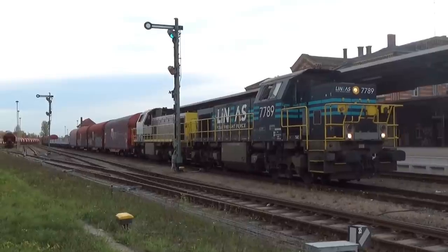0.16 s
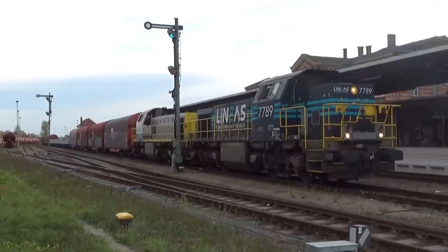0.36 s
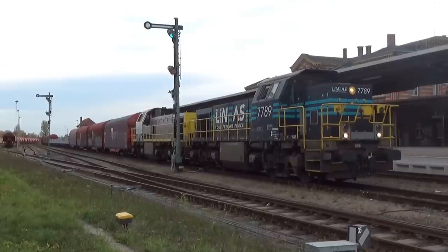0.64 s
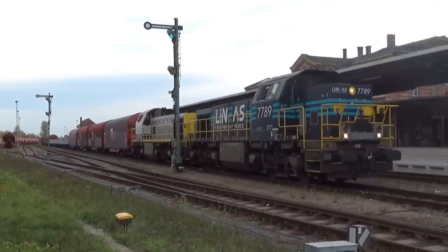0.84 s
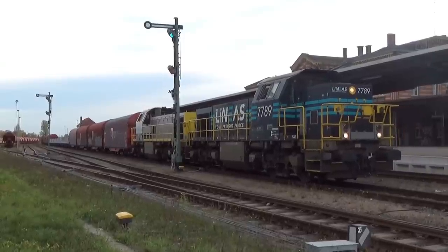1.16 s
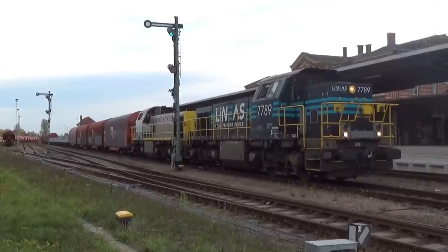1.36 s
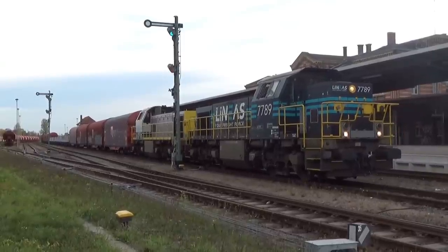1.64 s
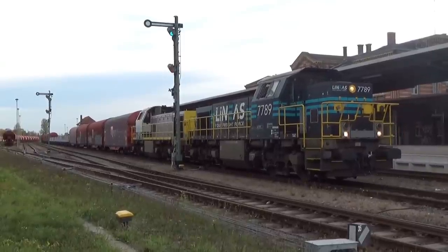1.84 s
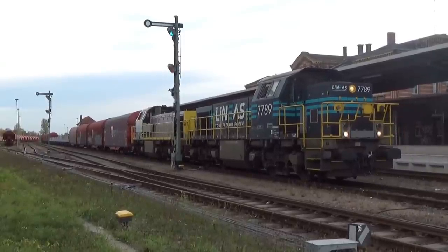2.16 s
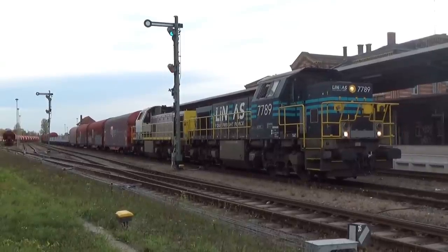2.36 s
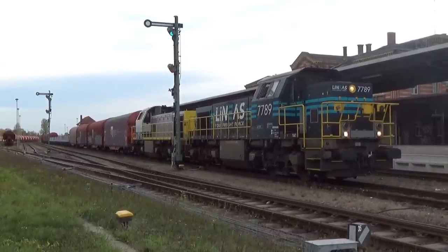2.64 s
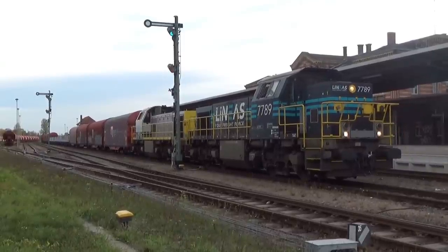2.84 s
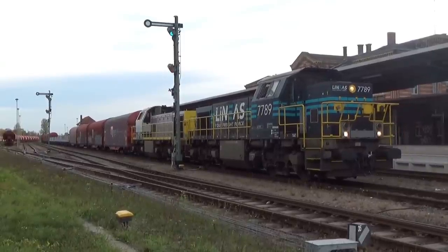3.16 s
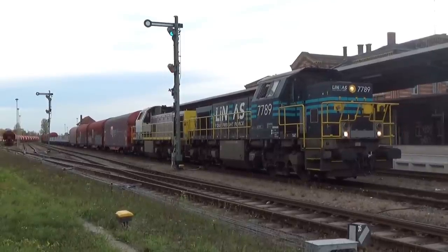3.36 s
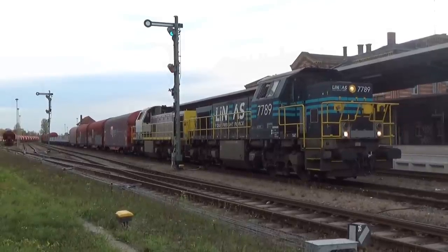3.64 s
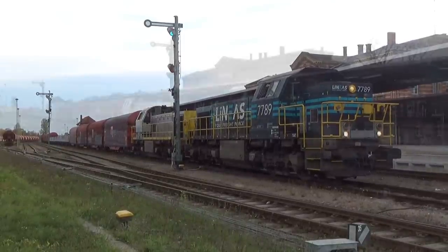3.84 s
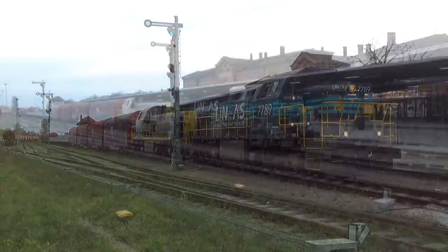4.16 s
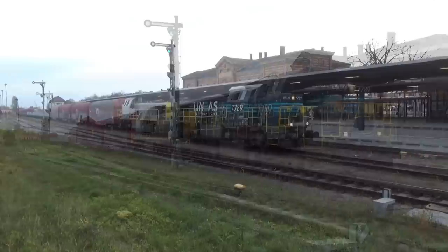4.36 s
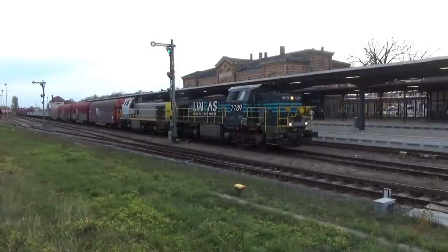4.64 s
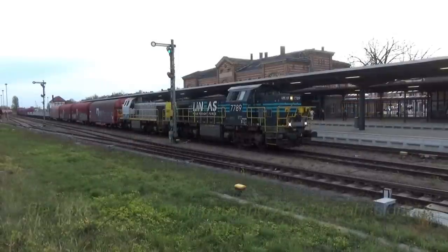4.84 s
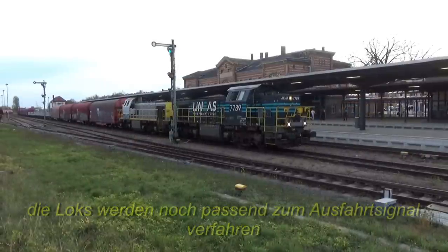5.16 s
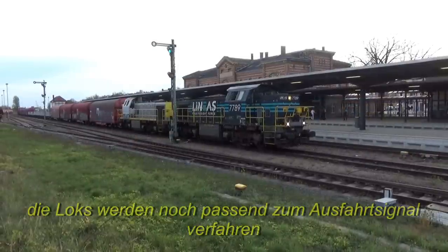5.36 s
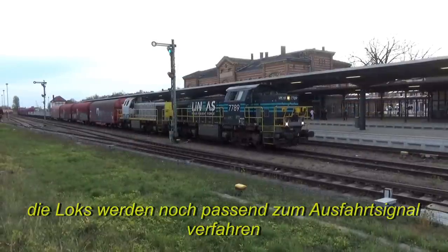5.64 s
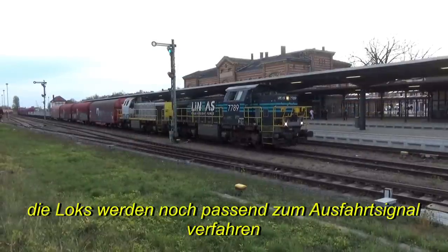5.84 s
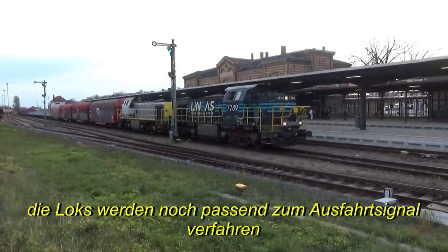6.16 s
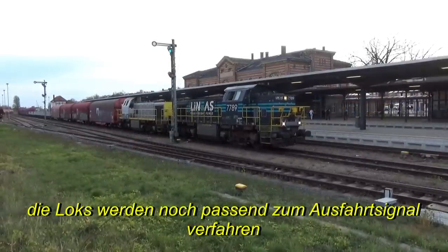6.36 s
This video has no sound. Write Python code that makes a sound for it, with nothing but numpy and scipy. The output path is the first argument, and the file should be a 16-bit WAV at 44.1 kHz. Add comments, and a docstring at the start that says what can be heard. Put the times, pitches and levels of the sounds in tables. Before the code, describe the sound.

Beside a railway, freight wagon brakes grind and ring in high, trembling squeals that die away within about a second. Distant diesel locomotives idle quietly with a thin, throbbing whine, and a faint hiss swells and fades. A little past halfway, much closer engines take over with a loud roar, a stronger whine, a low exhaust rumble and a few sharp ticks.

```python
"""Beside a freight railway. Brake blocks grind on the wagon wheels and make them ring in high squeals, then let
go. Far off, idling diesel locomotives hum on, and their gear teeth make a whine near 3 kHz that throbs with
each turn of the shaft. A faint hiss swells and fades. Then the scene fades over to much nearer engines under
load, with a louder whine, a low exhaust rumble and a few sharp ticks."""
import sys
import numpy as np
from scipy import signal
from scipy.fft import rfft, irfft
from scipy.io import wavfile
from scipy.ndimage import uniform_filter1d

SR = 44100
rng = np.random.default_rng(int(sys.argv[2]) if len(sys.argv) > 2 else 0)


def unload_audio(sound):
    """Save the sound as a 16-bit wav file, at the path given as the first command line argument."""
    columns = np.transpose(np.atleast_2d(sound))
    # keep every value between -1 and 1, then stretch to whole-number steps
    steps = np.round(np.clip(columns, -1, 1) * 32767)
    wavfile.write(sys.argv[1], SR, steps.astype(np.int16))


N = 286650
T = np.arange(N) / SR
RELEASE_S = 0.64   # the brake blocks lift off the wheels
# How alike left and right sound. Each row: frequency in Hz, likeness (1 means the same).
STEREO_LIKENESS = [(60, 1), (200, .997), (400, .99), (700, .93), (1300, .9), (2400, .92), (4400, .9),
                   (7800, .89), (9500, .95), (11500, .995), (15000, 1)]


def from_db(db):
    """Turn a level in dB into a number to multiply by."""
    return 10 ** (np.asarray(db) / 20)


def rms_one(x):
    """Scale a signal so that its average strength (rms) is 1."""
    return x / np.sqrt(np.mean(x ** 2) + 1e-20)


def at_hz(points, hz):
    """Read between the rows of a (frequency, value) table, giving every octave equal room."""
    pitches, values = np.transpose(points)
    return np.interp(np.log(hz), np.log(pitches), values)


def with_levels(rows, sound):
    """Make a sound follow (seconds, dB) rows, fading to silence 40 ms beyond either end."""
    times, levels_db = np.transpose(rows)
    gate = np.interp(T, [times[0] - .04, times[0], times[-1], times[-1] + .04], [0, 1, 1, 0])
    return gate * from_db(np.interp(T, times, levels_db)) * sound


def drift(rate_hz):
    """A smooth random wobble of size about 1; a higher rate wobbles faster."""
    r = np.exp(-80 * np.pi * rate_hz / SR)
    coarse = rng.standard_normal(N // 40 + 2002)   # one value for every 40 samples
    slow = signal.lfilter([1], [1, -2 * r, r * r], coarse)[2000:]
    return np.interp(np.arange(N) / 40, np.arange(len(slow)), rms_one(slow))


def panned(tone, hz, pan_db, spread):
    """Split a complex tone into left and right; level and phase differ less where the sides are alike."""
    apart = np.clip(1 - at_hz(STEREO_LIKENESS, hz), 0, .1) * 10
    lead = spread * (rng.choice([-1, 1]) + 0.53 * drift(4.0)[:len(tone)])
    skew = np.exp(1j * apart * lead) * from_db(apart * pan_db / 2)
    return np.sqrt(2) * np.real([tone * skew, tone / skew])


def banded_noise(colour, flicker_db):
    """Stereo noise shaped by (Hz, dB) rows; its octaves flicker partly together, partly alone."""
    hz = np.maximum(np.fft.rfftfreq(N, 1 / SR), 1)
    alike = np.clip(at_hz(STEREO_LIKENESS, hz), 0, 1)
    white = rfft(rng.standard_normal((2, N)))
    shaped = white * from_db(at_hz(colour, hz)) * np.sqrt([1 + alike, 1 - alike])
    out, together, octave = 0, drift(6), np.log2(hz / 20)
    for band in range(11):
        share = np.clip(1 - abs(octave - band), 0, 1)
        out = out + irfft(shaped * share, N) * from_db(flicker_db * (0.86 * together + drift(24)))
    middle, side = out
    return rms_one(np.array([middle + side, middle - side]))


def resonate(x, hz, width_hz):
    """Make a sound ring near one pitch by passing it twice through a resonance."""
    r = np.exp(-np.pi * width_hz / SR)
    section = [1 - r, 0, r - 1, 1, -2 * r * np.cos(2 * np.pi * hz / SR), r * r]
    return signal.sosfilt([section, section], x)


def ringing_noise(resonances):
    """One noise rings through several resonances, each adding a rough hum."""
    noise = banded_noise([(20, 0), (20000, 0)], flicker_db=0)
    return sum(from_db(db) * rms_one(resonate(noise, hz, width)) for hz, width, db in resonances)


def exhaust_rumble():
    """The exhaust thuds in the deep bass, loudest once the near engines come in."""
    # Each row: time in seconds, level in dB.
    levels = [(0.0, -65), (0.43, -78), (3.82, -55.5), (4.35, -44), (5.3, -44), (6.5, -41)]
    # Each row: pitch in Hz, width in Hz, dB added to the level.
    resonances = [(25, 8, -17.5), (52.5, 11, -2), (79.5, 12, 0.5)]
    return with_levels(levels, ringing_noise(resonances))


def faint_hiss():
    """A thin, high hiss swells and fades."""
    # Each row: time in seconds, level in dB.
    levels = [(1.4, -79), (2.5, -78), (3.2, -60), (3.9, -77)]
    # Each row: frequency in Hz, relative strength in dB.
    colour = [(4000, -30), (7000, -13.5), (9000, 5), (12000, -7), (15000, -14)]
    return with_levels(levels, banded_noise(colour, flicker_db=1.0))


def ticks():
    """Sharp ticks, each a few milliseconds of bright noise."""
    # Each row: start in seconds, level in dB before filtering, centre pitch in Hz.
    bursts = [(3.754, -27, 10500), (3.766, -33, 10000), (3.78, -39, 9000), (4.038, -29, 8500),
              (5.316, -30, 12800)]
    out = np.zeros(N)
    for start, db, hz in bursts:
        burst = rng.standard_normal(N) * (T > start) * np.exp(-np.clip(T - start, 0, 1) / .003)
        band = signal.butter(2, [hz * .8, hz * 1.2], "band", fs=SR, output="sos")
        out += from_db(db) * signal.sosfilt(band, burst + 1e-18)
    return out


def machinery_tones(pitches_hz, levels_db, waver, flicker_db):
    """Spinning parts sing steady tones that waver a little in level and pitch."""
    out = 0
    for hz, db in zip(pitches_hz, levels_db):
        level = from_db(db + flicker_db * drift(9.1))
        phase = hz * (2 * np.pi * T + waver * drift(3))
        out = out + panned(level * np.exp(1j * phase), hz, pan_db=-.3, spread=0.25)
    return out


def gear_whine(rows, mesh_hz, shaft_hz, waver, overtone_db, pan_db):
    """Gear teeth meet at mesh_hz; a tone one shaft rate below and one above make the whine throb."""
    mesh_phase = 2 * np.pi * mesh_hz * T + waver * drift(1.5)
    tone = 0
    for side, (db, second_db, dips) in zip((-1, 0, 1), rows):
        # A second engine slides in and out of step, partly cancelling the first at each dip.
        beat_turns = np.interp(T, dips, np.arange(len(dips)))
        pair = 1 - from_db(second_db) * np.exp(2j * np.pi * beat_turns)
        phase = mesh_phase + 2 * np.pi * side * shaft_hz * T + 0.4 * drift(4.2)
        tone = tone + from_db(db + 0.67 * drift(21)) * pair * np.exp(1j * phase)
    strength = uniform_filter1d(abs(tone), size=4096)
    overtone = from_db(overtone_db) * tone ** 2 / strength   # squaring gives the octave above
    return panned(tone + overtone, mesh_hz, pan_db, spread=0.16)


def far_engines():
    """Distant diesels idle: a soft roar, humming bodies and a gear whine a little to the right."""
    # Each row: time in seconds, level in dB.
    engine_levels, whine_levels = [(0.0, -41), (0.4, -53.5), (0.79, -44), (1.35, -46), (2.47, -40.5),
                                   (3.11, -37), (3.65, -36.5), (4.3, -30)], [(0.5, -44), (1.2, -48), (2.3, -40.5), (2.9, -39.5),
                                                 (3.5, -39.5), (3.75, -39), (4.0, -52)]
    # The roar. Each row: frequency in Hz, relative strength in dB.
    colour = [(60, -42.5), (125, -18), (220, -10.5), (335, -12.5), (530, -7), (860, -5.5), (1300, -11.5),
              (1670, -10.5), (2700, -17), (3100, -15), (3700, -20.5), (6200, -28), (10000, -40),
              (15000, -51.5)]
    # Body resonances. Each row: pitch in Hz, width in Hz, dB added to the engine level.
    body = [(452, 15, -15.5), (541.6, 160, -12.5), (886.4, 36, -10), (1682, 36, -18)]
    # Spinning parts: their pitches in Hz, and their dB added to the engine level.
    parts_hz, parts_db = [1170, 1564, 1708, 5917, 5959, 1954, 2347, 2633, 2918, 3082, 3138, 3284, 3327,
                          3413, 5712], [-16, -22, -14.5, -30.5, -28.5, -22.5, -21, -17, -34.5, -22,
                                                 -23, -24.5, -17.5, -27, -28]
    # Lower, middle and upper whine tone. Each row: dB added to the whine level,
    # second engine in dB against the first, times of the dips in seconds.
    gear_tones = [(-11.5, -3.5, [0, 0.899, 2.0, 3.18, 4.3]), (-4, -20.5, [-.5, 1.6, 9]),
                  (-1.5, -5, [0, 1.05, 3.0, 4.1])]
    roar = from_db(0.5) * banded_noise(colour, flicker_db=0.56) + ringing_noise(body)
    whine = gear_whine(gear_tones, mesh_hz=3000.3, shaft_hz=40.8, waver=0.36,
                       overtone_db=-29.5, pan_db=-3.5)
    tones = machinery_tones(parts_hz, parts_db, waver=.0004, flicker_db=2.5)
    return with_levels(engine_levels, roar + tones) + with_levels(whine_levels, whine)


def near_engines():
    """Close diesels work under load: a loud roar, humming bodies and a faster-throbbing whine."""
    # Each row: time in seconds, level in dB.
    engine_levels, whine_levels = [(3.55, -49), (3.73, -34.5), (4.11, -25), (4.4, -21), (4.81, -19),
                                   (6.5, -19)], [(3.62, -49), (3.82, -30), (4.0, -24.5), (4.4, -21.5),
                                                 (4.7, -18), (5.0, -20.5), (5.3, -19.5), (5.55, -20.5),
                                                 (5.75, -19), (6.3, -20), (6.5, -15.5)]
    # The roar. Each row: frequency in Hz, relative strength in dB.
    colour = [(60, -18), (128, -17.5), (290, -6), (430, -3.5), (650, -3.5), (810, -0.5), (1350, -7),
              (1700, -7), (2300, -10.5), (3100, -9.5), (4200, -13.5), (9300, -28), (12000, -39.5),
              (15000, -45.5)]
    # Body resonances. Each row: pitch in Hz, width in Hz, dB added to the engine level.
    body = [(155.5, 25, -23.5), (188.4, 9.1, -28), (290.6, 26, -18), (410, 64, -12.5), (485, 26, -12.5),
            (783, 21, -14.5), (1663, 190, -10.5), (1967, 41, -13), (2840, 14, -16)]
    # Spinning parts: their pitches in Hz, and their dB added to the engine level.
    parts_hz, parts_db = [825, 995, 1032, 1100, 1171, 1560, 1651, 2046, 2078, 2202, 2433, 3096, 3199, 3242,
                          3404, 3505, 5226, 7075, 7883, 8942, 9044, 10157], [-8, -12, -12, -17, -19, -20, -15, -23, -21, -24, -22, -19,
                                                 -19, -20, -16, -20, -32, -38, -36, -42, -42, -34]
    # Lower, middle and upper whine tone. Each row: dB added to the whine level,
    # second engine in dB against the first, times of the dips in seconds.
    gear_tones = [(-1.5, -4.5, [3.6, 4.3, 4.81, 5.65, 6.27, 6.9]),
                  (-12.5, -17, [3.6, 4.1, 5.0, 5.5, 6.0, 6.9]),
                  (-1, -9, [3.75, 4.07, 4.55, 4.86, 5.13, 5.57, 5.95, 6.33, 6.7])]
    roar = from_db(0.5) * banded_noise(colour, flicker_db=0.5) + ringing_noise(body)
    whine = gear_whine(gear_tones, mesh_hz=2997, shaft_hz=49.7, waver=.8, overtone_db=-32, pan_db=-.3)
    tones = machinery_tones(parts_hz, parts_db, waver=0.0011, flicker_db=2.0)
    return with_levels(engine_levels, roar + tones) + with_levels(whine_levels, whine)


def brake_grinding(note_count):
    """Blocks rub the rough wheel treads and stir many wheel notes, each flaring and dying on its own."""
    # Each row: time in seconds, level in dB.
    levels = [(0, -21.5), (.14, -28.5), (.29, -25), (.34, -27.5), (.385, -23.5), (.43, -32.5), (.56, -27.5),
              (.65, -27.5), (.72, -27.5), (.9, -41.5), (1.1, -57), (1.3, -63)]
    # The rubbing noise. Each row: frequency in Hz, relative strength in dB.
    colour = [(300, -44.5), (700, -22), (1050, 0), (1400, -11), (2300, -6.5), (4300, 2), (6000, -3),
              (8000, -3.5), (11000, -9), (15000, -15.5)]
    span = round(1.4 * SR)
    rubbing = banded_noise(colour, flicker_db=.3)[:, :span]
    ringing = 0
    for hz in 900 * (15000 / 900) ** (rng.random(note_count) ** .5):
        ringing = ringing + resonate(rubbing, hz, width_hz=30) * from_db(5 * drift(9)[:span])
    grind = np.zeros((2, N))
    grind[:, :span] = rms_one(ringing) + from_db(-4) * rubbing
    dull = signal.sosfiltfilt(signal.butter(2, 9000, fs=SR, output="sos"), grind)
    treble = (grind - dull) * from_db(-35 * np.clip(T - RELEASE_S, 0, None))   # dies first on release
    judder = from_db(.8 * drift(15))
    lean_right = from_db([[-.4], [.4]])
    return with_levels(levels, judder * (dull + treble)) * lean_right


def brake_squeals():
    """Under the blocks, each natural note of the wheels catches, sings a trembling tone and slips."""
    # The notes the wheels ring at, in Hz.
    wheel_hz = [4348, 7366, 8938, 7514, 9849, 4212, 7452, 11300, 8700, 5553, 5323, 5855, 4480, 3812, 4960,
                3612, 3046, 3164, 1040, 1306, 1562, 1162, 6355, 4702, 14945, 13645, 10005, 9656, 965, 5130,
                4275, 2799, 3394]
    # One list of catches for each note. Each row: time of full strength in seconds,
    # hold in seconds, level in dB, fade in dB per second.
    note_catches = [
        [(.012, 0.01, -14.5, 129), (.172, 0.011, -11.5, 302), (.262, 0.029, -28, 400), (.34, 0.0057, -21, 500),
         (.39, 0.0074, -21, 599), (.44, 0.19, -23, 199.5), (.8, 0.087, -39, 130), (1.12, .03, -50, 90)],
        [(0, 0.014, -26, 200), (.085, 0.048, -18.5, 151.5), (.17, 0.0075, -16.5, 699),
         (.212, 0.031, -11.5, 1001), (.28, 0.043, -13.5, 248), (.4, 0.17, -12, 250.5), (.6, 0.073, -13, 101.5)],
        [(0, 0.1, -26, 198), (.115, .03, -12, 250), (.195, 0.007, -13.5, 260.5), (.255, .015, -12, 161),
         (.37, 0.14, -15.5, 399.5), (.57, 0.022, -18, 1198.5), (.618, 0.011, -19, 300), (.66, 0.074, -17, 140),
         (.96, 0.048, -40, 109)],
        [(0, 0.018, -24, 153), (.155, .02, -25.5, 260), (.28, .03, -27.5, 800.5), (.38, .02, -26, 399.5),
         (.62, 0.16, -25.5, 122)],
        [(0, 0.046, -17.5, 796), (.11, .04, -23, 599.5), (.18, .08, -30.5, 300), (.33, .02, -36, 140)],
        [(.57, 0.0082, -23.5, 800.5), (.635, .015, -22, 600), (.695, 0.099, -21, 153)],
        [(.76, 0.029, -25, 115.5)],
        [(.03, 0.018, -25, 700), (.088, 0.025, -28, 216)],
        [(0.004, .12, -29.5, 100)],
        [(.28, 0.041, -23, 301)],
        [(.3, .02, -34, 251.5), (.38, .02, -38.5, 399.5)],
        [(.27, .26, -34, 150), (.6, 0.052, -28, 450)],
        [(.31, .36, -33, 92)],
        [(.19, 0.11, -38.5, 199), (.46, 0.11, -34.5, 70)],
        [(0, .16, -32.5, 151.5)],
        [(.38, 0.023, -33, 251)],
        [(.24, 0.04, -31.5, 299.5)],
        [(.63, .14, -38.5, 88)],
        [(0, 0.12, -39, 102), (.5, 0.35, -45, 150)],
        [(.13, .05, -39, 249), (.23, 0.016, -32, 401.5)],
        [(.39, 0.23, -44, 90)],
        [(.62, 0.031, -38, 400)],
        [(.5, .06, -40, 201.5), (.63, .04, -39.5, 300)],
        [(0.595, .16, -39.5, 83)],
        [(0.0037, .08, -42.5, 55)],
        [(.35, .37, -55, 64)],
        [(.51, 0.31, -51, 75)],
        [(.61, .15, -51, 36)],
        [(.3, .08, -48, 200), (.73, 0.2, -47, 200)],
        [(.13, 0.11, -38.5, 204), (.62, 0.13, -57, 87)],
        [(.92, 0.19, -51, 47)],
        [(0.336, 0.015, -33.5, 399)],
        [(.27, 0.052, -38.5, 300.5)],
    ]
    # Each row: frequency in Hz, left minus right in dB before panned() narrows it.
    balance = [(1000, -0.2), (4350, -2), (6000, 1.5), (7400, -4), (9000, -5), (9900, -6), (11300, 8)]
    rise_db_per_s, tremble_db, tremble_radians = 700.5, 1.3, .5
    out, t = np.zeros((2, N)), T[:2 * SR]
    freed = np.clip((t - RELEASE_S) / .3, 0, 1)
    clock = np.cumsum(1 + .002 * freed) / SR   # a freed wheel rings slightly higher
    for hz, catches in zip(wheel_hz, note_catches):
        catch_levels = [db - rise_db_per_s * np.clip(full_at - t, 0, None)
                        - fade * np.clip(t - full_at - hold, 0, None)
                        for full_at, hold, db, fade in catches]
        level_db = np.max(catch_levels, axis=0)   # the strongest catch wins
        phase = 2 * np.pi * hz * clock + tremble_radians * drift(25)[:len(t)]
        tone = from_db(level_db + tremble_db * drift(25)[:len(t)]) * np.exp(1j * phase)
        out[:, :len(t)] += panned(tone, hz, at_hz(balance, hz), spread=.2)
    return out


def scene():
    """Add up the brakes, the engines and the small sounds around them."""
    brakes = brake_squeals() + brake_grinding(note_count=140)
    return brakes + far_engines() + faint_hiss() + near_engines() + exhaust_rumble() + ticks()


def record(dry):
    """Cut away the highest treble, above 15100 Hz."""
    return signal.sosfilt(signal.ellip(10, .5, 70, 15100, fs=SR, output="sos"), dry)


dry = scene()
out = record(dry)
unload_audio(out)
```